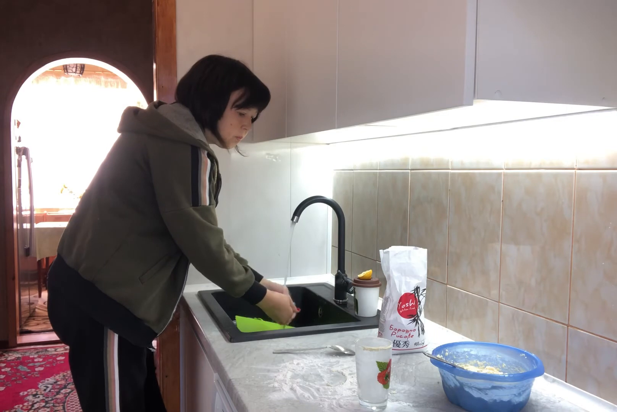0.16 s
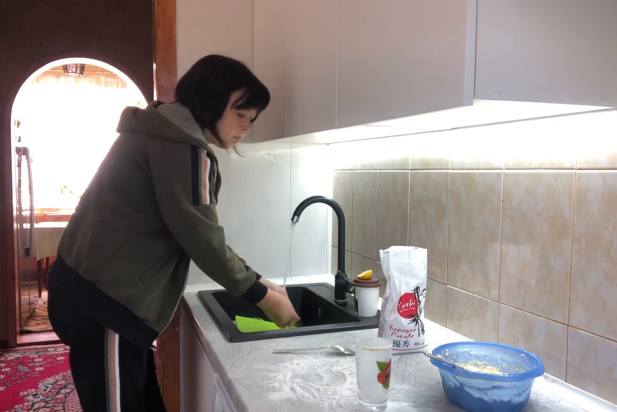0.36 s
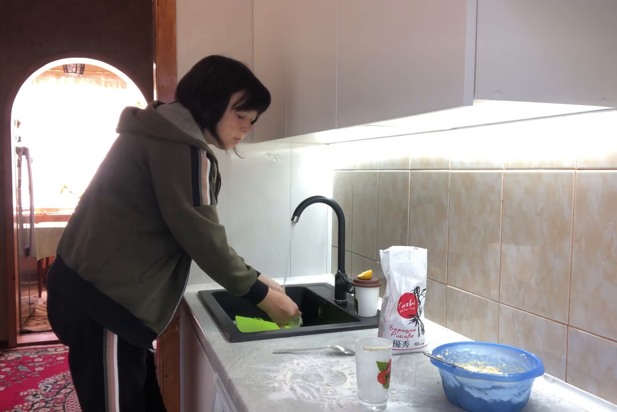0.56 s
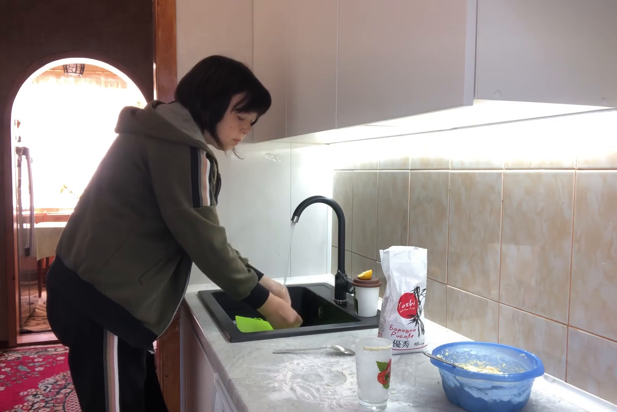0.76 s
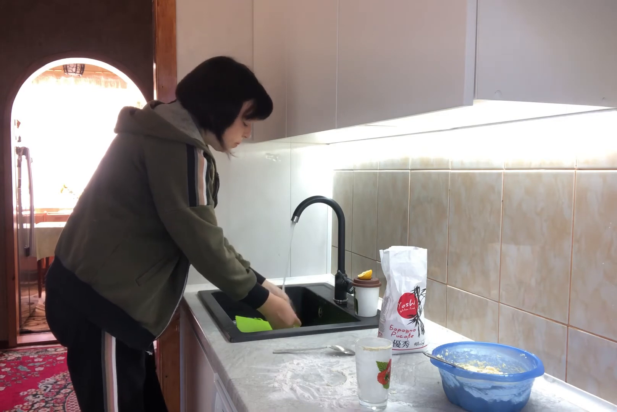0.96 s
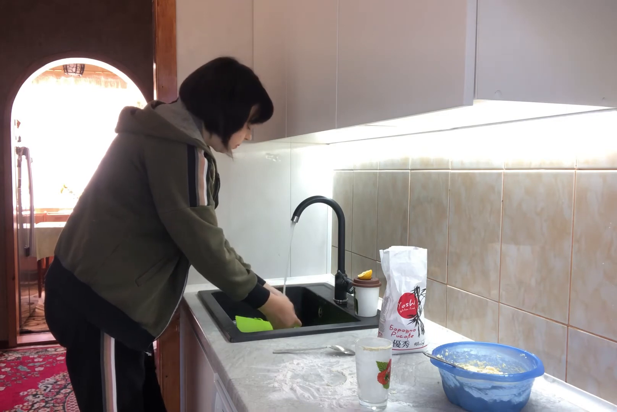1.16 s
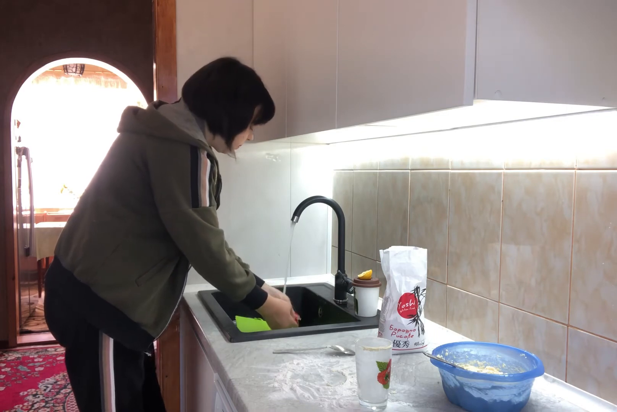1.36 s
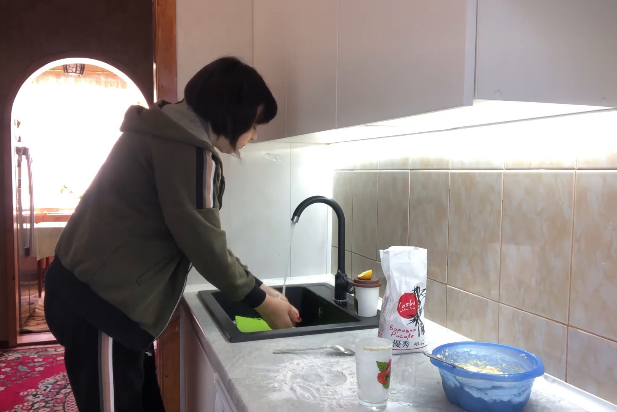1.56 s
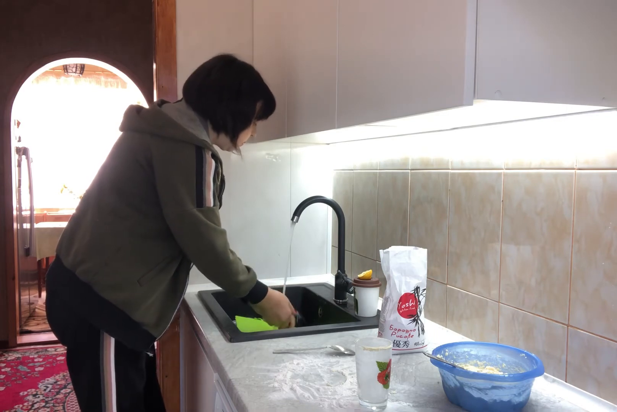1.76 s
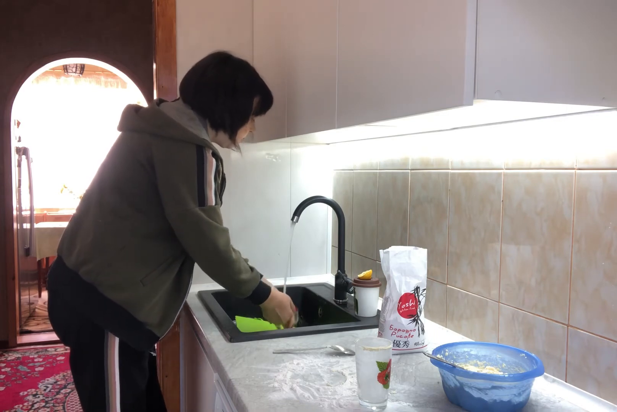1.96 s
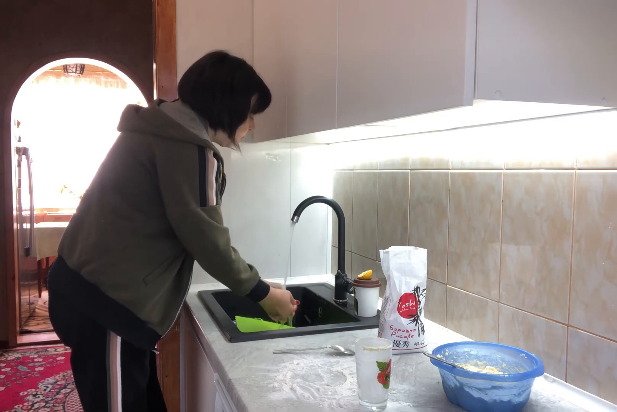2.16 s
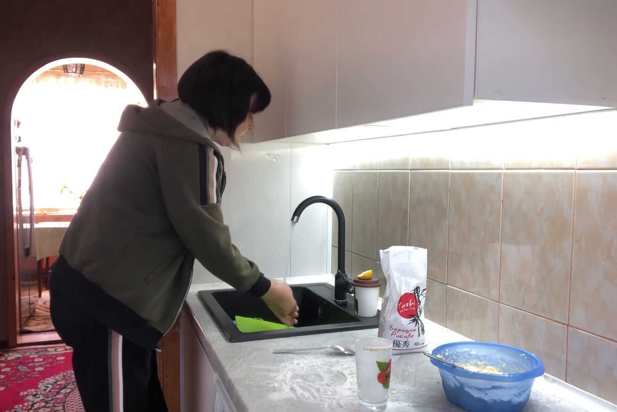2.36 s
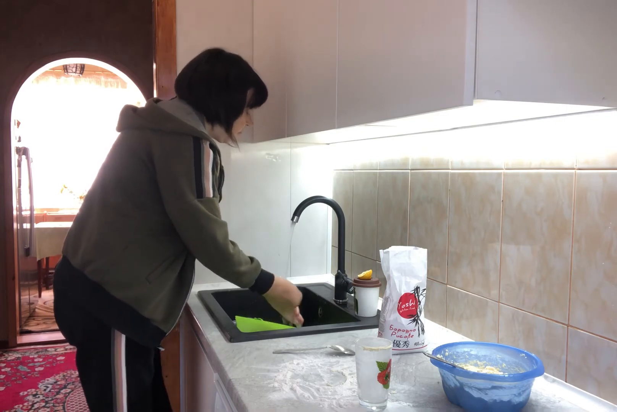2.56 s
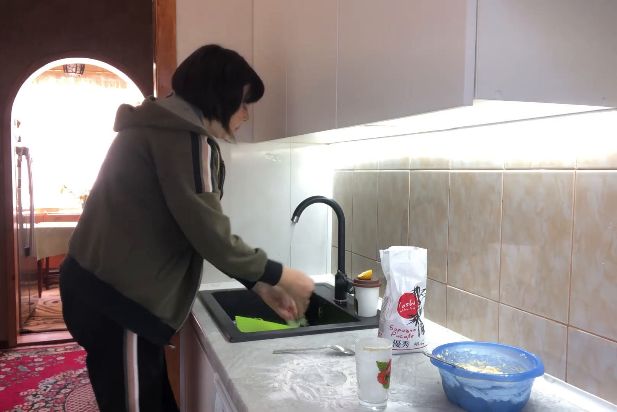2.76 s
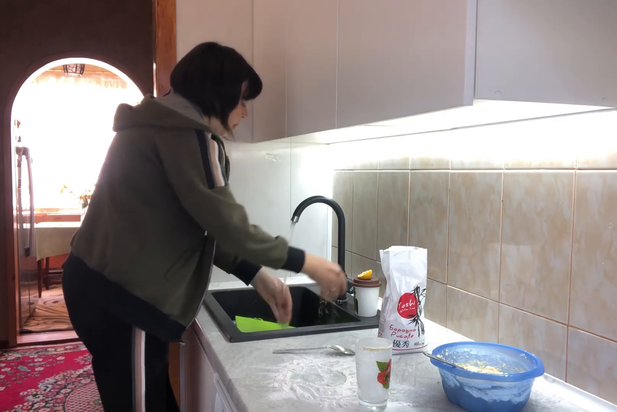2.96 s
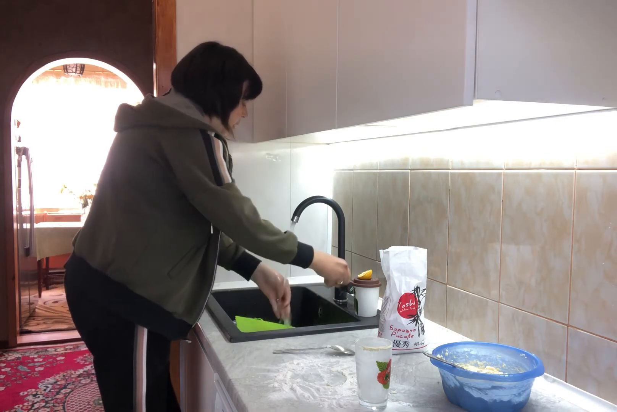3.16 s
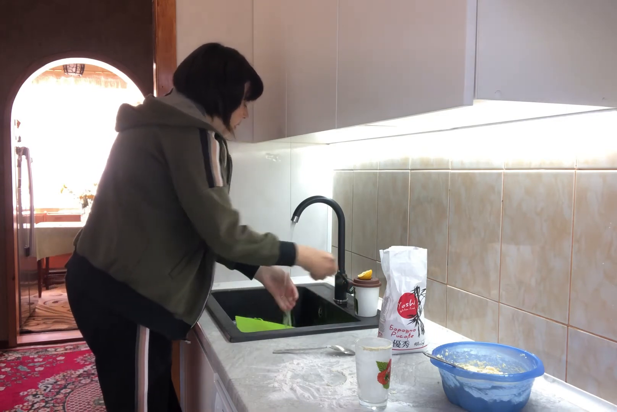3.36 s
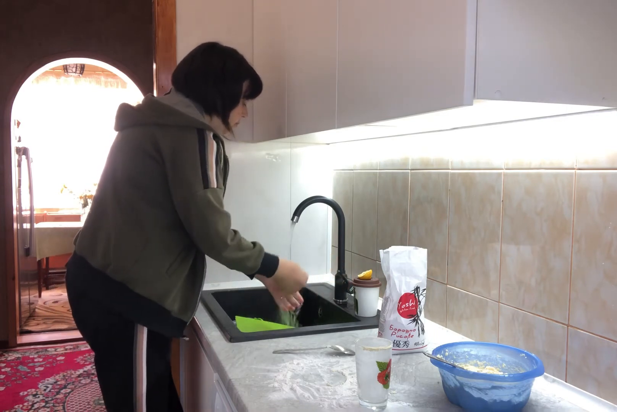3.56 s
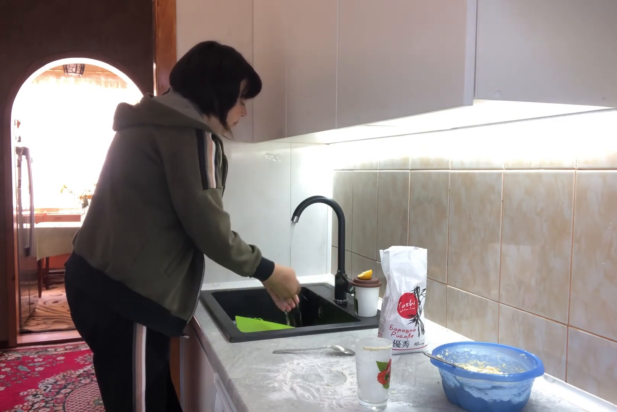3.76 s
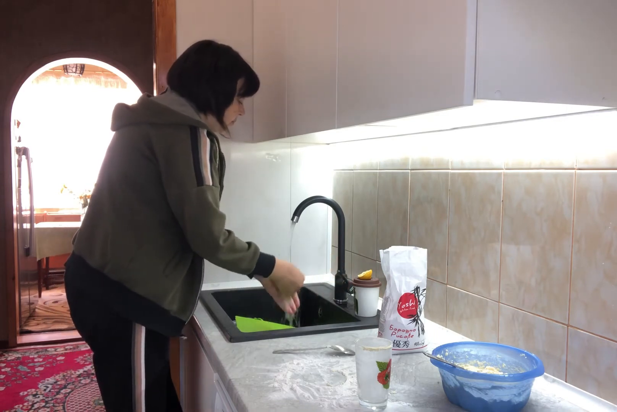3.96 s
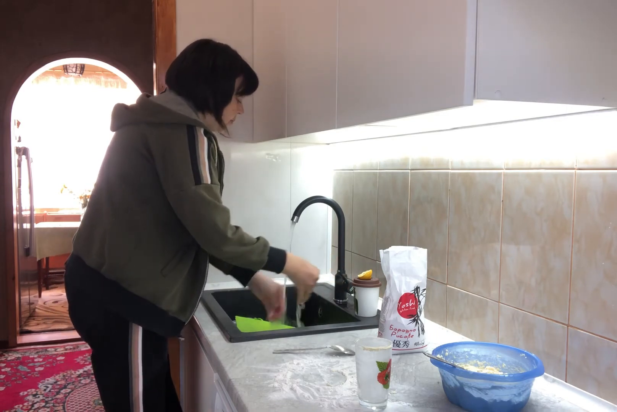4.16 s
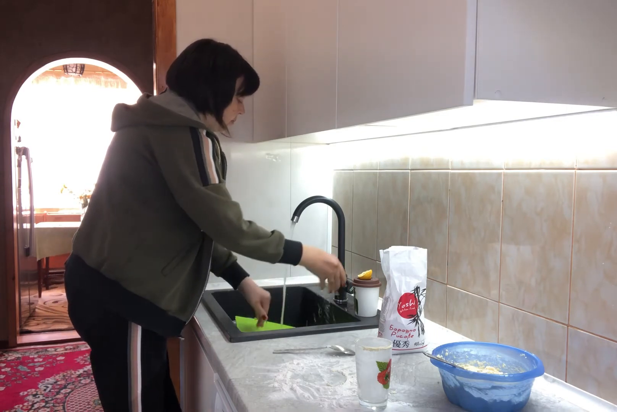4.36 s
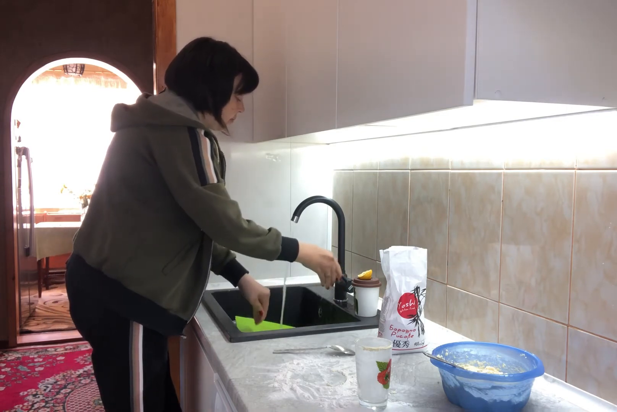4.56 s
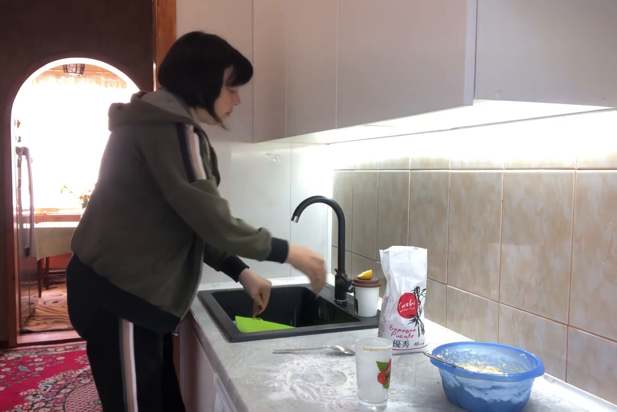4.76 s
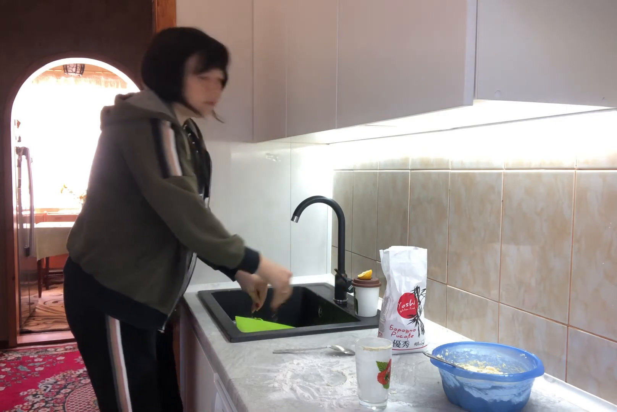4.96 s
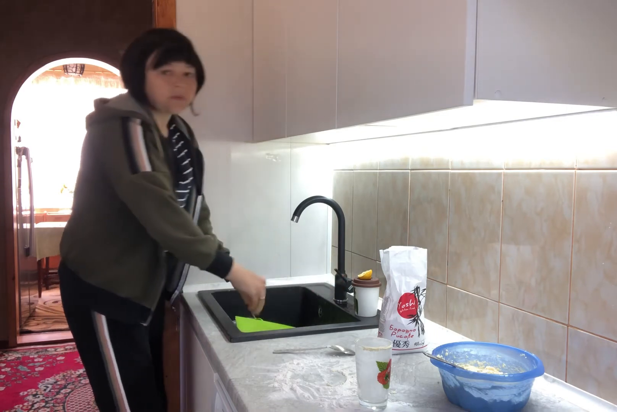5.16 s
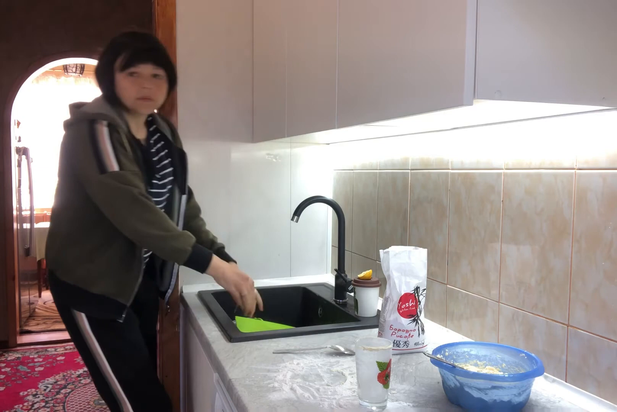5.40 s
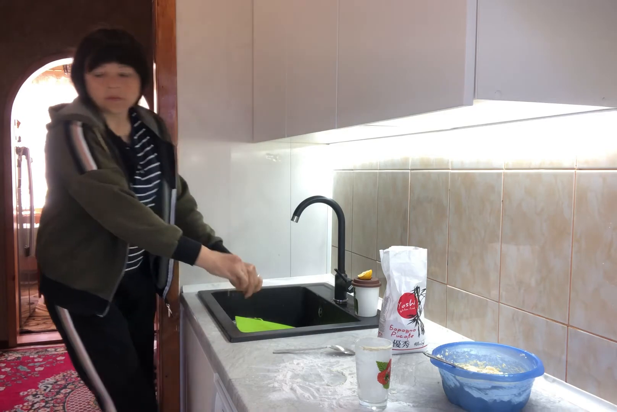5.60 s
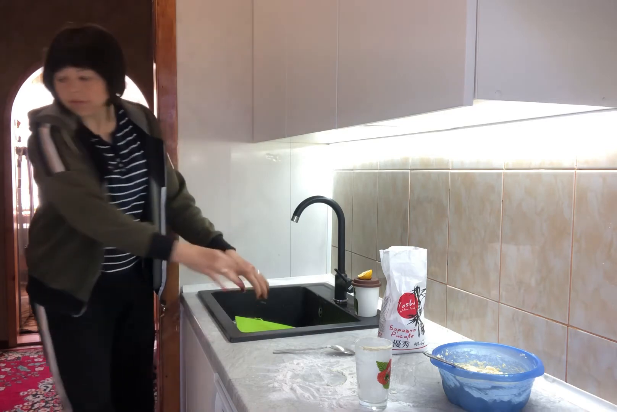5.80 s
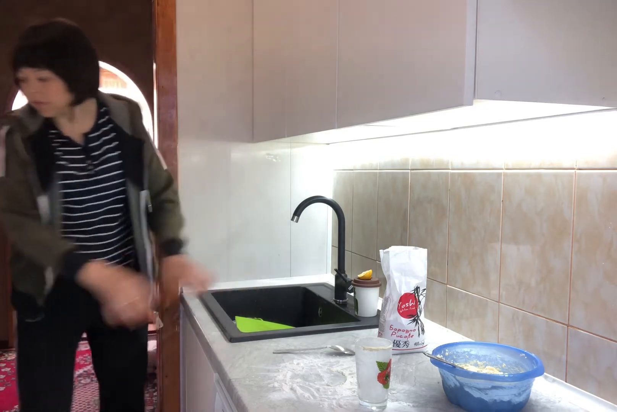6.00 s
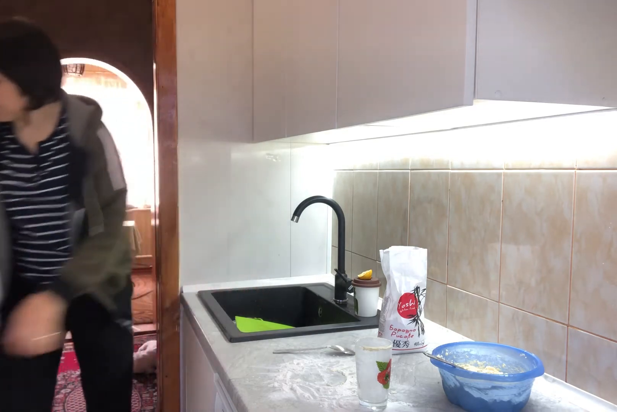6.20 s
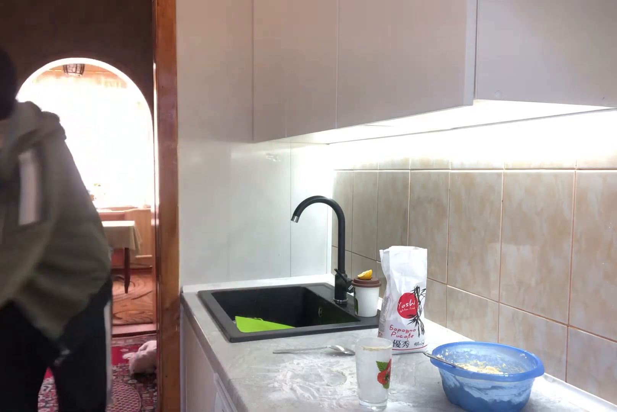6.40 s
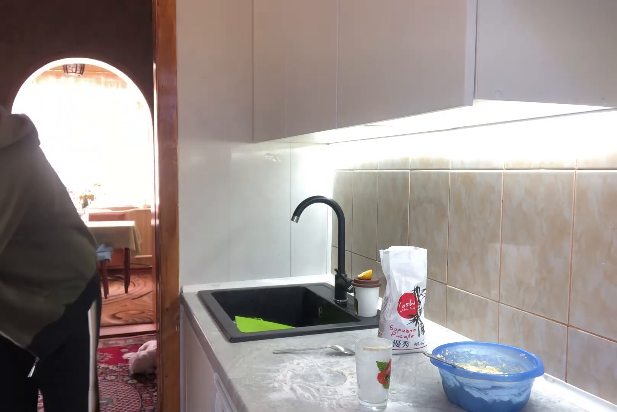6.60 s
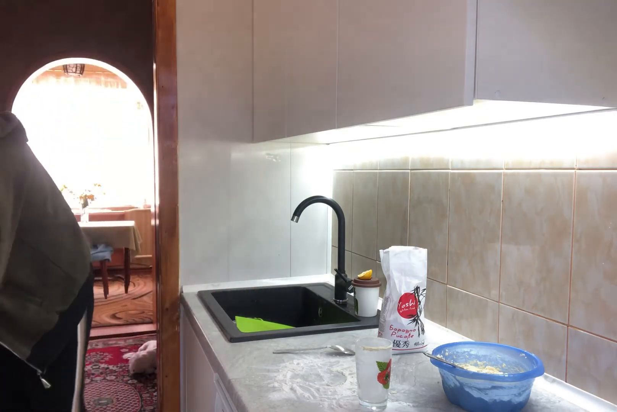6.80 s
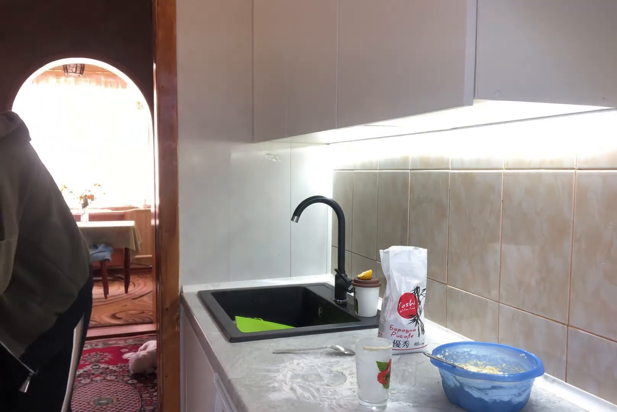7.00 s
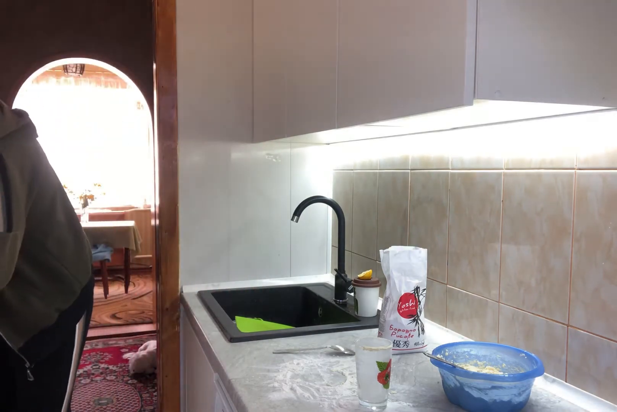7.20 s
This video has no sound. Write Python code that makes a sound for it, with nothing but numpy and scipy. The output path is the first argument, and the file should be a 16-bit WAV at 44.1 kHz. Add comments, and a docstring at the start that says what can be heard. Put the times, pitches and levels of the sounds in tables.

```python
"""A kitchen tap hisses and whistles over hands in a sink and is shut off: filtered noise and wavering sines.
Drops spatter and drum on the basin as shaped random clicks; air bubbles ring in the cupped palms as rising sines.
Slaps are noise puffs and soft knocks are damped modes with a scuff; wet hands are shaken and a sleeve brushes.
Shifting reflections make the small tiled room, over an appliance's mains hum and steady room noise."""
import sys
import numpy as np
from scipy import signal
from scipy.fft import rfft, irfft
from scipy.io import wavfile

SR = 44100
rng = np.random.default_rng(int(sys.argv[2]) if len(sys.argv) > 2 else 0)


def store_pcm(level_fs):
    """Save levels as 16-bit WAV."""
    pcm = np.round(np.clip(level_fs, -1, 1) * 32767).astype(np.int16)
    wavfile.write(sys.argv[1], SR, np.atleast_2d(pcm).T)


N = 319284
TIME = np.arange(N) / SR

# Flow through the valve. Each row: time in seconds, gain in dB.
FLOW_GAIN = [(0, 2.5), (4.3, 2.5), (4.45, 0), (4.6, -33)]
# Hiss spectrum. Each row: frequency in Hz, relative density in dB.
HISS_SPECTRUM = [(700, -9.5), (1050, -10.5), (1500, -6.5), (1850, -2), (2250, -10.5), (3400, -10),
                 (5500, -0.5), (6300, -4.5), (7600, -2.5), (8500, -14), (15500, -17)]
# Valve and spout resonances. Each row: centre in Hz, half-width at -6 dB in Hz, level before flow gain in dB rms.
SPOUT_RESONANCES = [(1482, 14, -66), (2470, 6.5, -68.5), (3437, 13, -68), (3920, 19, -65.5),
                    (5560, 15, -67), (6980, 25, -61), (7135, 70, -55.5)]
# Valve whistle. Each row: time in seconds, level before flow gain in dB rms.
WHISTLE_LEVEL = [(0, -49.5), (0.62, -52.5), (0.7, -61), (0.88, -52), (0.99, -49), (2.93, -50.5),
                 (3.18, -57.5), (3.6, -45.5), (4.07, -52), (4.12, -56), (4.35, -50), (4.46, -60)]
# Thin pure tone of the spout. Each row: time in seconds, level before flow gain in dB rms.
TONE_LEVEL = [(3.62, -68), (3.72, -57), (3.92, -55), (3.99, -71)]


def tap():
    """Flow noise hisses and rings the spout; a whistle and a lower pure tone sound with it, all scaled by flow."""
    hiss = amp(-48.0) * coloured(rng.standard_normal(N), HISS_SPECTRUM)
    spout = sum(amp(db) * narrow_noise(hz, half_width_hz) for hz, half_width_hz, db in SPOUT_RESONANCES)
    whistle = level(WHISTLE_LEVEL) * wavering_tone(6543, jitter_hz=16.4, flutter_db=3.5)
    tone_gain = amp(np.interp(TIME, *np.transpose(TONE_LEVEL)))
    tone = tone_gain * wavering_tone(3840, jitter_hz=2, flutter_db=0.5)
    return (hiss + spout + whistle + tone) * level(FLOW_GAIN)


def wavering_tone(hz, jitter_hz, flutter_db):
    """A whistle of rms 1 whose pitch and strength tremble with the turbulence."""
    turns = np.cumsum(hz + jitter_hz * wander(per_s=64)) / SR
    return evened(np.sin(2 * np.pi * turns) * amp(flutter_db * wander(per_s=29)))


def narrow_noise(hz, half_width_hz):
    """Turbulence ringing in one sharp resonance: a fuzzy whistle of rms 1."""
    offset = (np.fft.rfftfreq(N, 1 / SR) - hz) / half_width_hz
    return evened(irfft(rfft(rng.standard_normal(N)) / (1 + offset ** 2), N))


# Spectra of spatter, fine spray and basin drumming. Each row: frequency in Hz, relative density in dB.
SPATTER_SPECTRUM = [(900, -68), (2300, -7.5), (3100, -1), (4600, 1), (6000, -5), (7600, -6), (9500, -9),
                    (15500, -24)]
SPRAY_SPECTRUM = [(3000, -10.5), (6000, 6), (8500, 3), (12500, 0.5), (15500, -8)]
BASIN_SPECTRUM = [(60, -38), (140, -18), (190, 1), (280, -1), (390, 2), (520, -3), (660, -3.5), (820, -1.5),
                  (1000, -8.5), (1500, -13), (2500, -33), (5000, -48)]
# Weight of water landing on the basin floor. Each row: time in seconds, relative level in dB.
DRUMMING_LEVEL = [(0, -53.5), (1.8, -55), (3.5, -52), (4.1, -53.5), (4.27, -50.5), (4.5, -55.5), (4.6, -60),
                  (4.85, -58)]


def splash():
    """The stream breaks on the hands: ringing droplets, fine spray, and heavier water drumming on the basin."""
    clumps = amp(1.3 * wander(per_s=45) + wander(per_s=9))
    drops = droplets(per_s=3500, spread_db=2.2, cycles=45)
    clicks = evened(impacts(per_s=1700, spread_db=5.5))
    spatter = coloured(drops + 0.6 * clicks, SPATTER_SPECTRUM) + 1.33 * plinks()
    spray = coloured(impacts(per_s=4000, spread_db=1.2), SPRAY_SPECTRUM)
    spray = spray * patter(per_s=120, decay_s=0.0075, depth=0.93)
    drumming = coloured(impacts(per_s=480, spread_db=2.5), BASIN_SPECTRUM)
    spatter_gain, spray_gain = thrown_water()
    return (amp(-0.5) * clumps * spatter * spatter_gain + spray * spray_gain
            + amp(-1.3) * drumming * level(DRUMMING_LEVEL))


# Undisturbed stream, thinner while the hands draw back.
# Each row: start in seconds, length in seconds, relative spatter level in dB, fine spray level in dB.
STREAM_SPELLS = [(0, 3.08, -49, -53), (3.198, 0.4, -48, -56), (3.696, 0.23, -54, -52),
                 (3.936, 0.7, -52.5, -55)]
# Splashes thrown up by the hands and by the last of the stream. Each row: as for the stream.
HAND_SPLASHES = [(-0, 0.28, -49, -49.5), (0.67, 0.025, -47, -51), (0.89, 0.52, -51, -50.5),
                 (1.515, 0.44, -49, -46.5), (2.029, 0.045, -44, -48), (2.13, 0.051, -44, -60),
                 (2.36, 0.019, -47.5, -50), (2.52, 0.16, -57, -53), (2.857, 0.2, -49, -58),
                 (3.508, 0.15, -46.5, -46.5), (3.92, 0.07, -46, -49), (4.162, 0.36, -46, -44.5),
                 (4.32, 0.16, -45.5, -45), (4.577, 0.17, -46.5, -41.5)]
STREAM_ATTACK_S, SPLASH_SWELL_SHARE, FALL_DB_PER_S = 0.0028, 0.14, 210  # swell: share of splash length


def thrown_water():
    """Gains of spatter and of fine spray: the splashes add their power to that of the stream."""
    rows = [(*row, STREAM_ATTACK_S) for row in STREAM_SPELLS]
    rows += [(*row, SPLASH_SWELL_SHARE * row[1]) for row in HAND_SPLASHES]
    power = 0
    for s, length_s, spatter_db, spray_db, attack_s in rows:
        gains = np.outer(amp([spatter_db, spray_db]), surge(s, length_s, attack_s))
        power = power + gains ** 2
    return np.sqrt(power)


def surge(s, length_s, attack_s):
    """Envelope of thrown water: attack, hold, then a steady fall in dB."""
    attack = np.clip((TIME - s) / attack_s, 0, 1)
    return attack * amp(-FALL_DB_PER_S * np.maximum(TIME - s - length_s, 0))


def droplets(per_s, spread_db, cycles, count=28):
    """Drops of many sizes, each ringing for a few cycles; the favoured sizes drift as the hands turn."""
    drops, kind = impacts(per_s, spread_db), rng.integers(0, count, N)
    out = np.zeros(N)
    drift = wander(per_s=7.4)
    for k, hz in enumerate(np.geomspace(1700, 9500, count)):
        ring = bubble(hz, cycles / hz, rise=0.02)
        favour = amp(2.4 * np.sin(k / 2 + 2 * drift))
        out += signal.oaconvolve(drops * favour * (kind == k), ring * hz)[:N]
    return evened(out)


def plinks(count=220):
    """Now and then a small drop traps a bubble that rings clear of the spatter."""
    out = np.zeros(N)
    for when, size, strength in rng.random((count, 3)):
        hz = 3000 * 2 ** size
        add(out, when * N / SR, amp(9 * strength) * bubble(hz, 80 / hz, rise=0.02))
    return out


def patter(per_s, decay_s, depth):
    """Gain of rms 1: each lump of water bursts at once into spray that dies away."""
    arrivals = rng.exponential(1, N) * (rng.random(N) < per_s / SR)
    lumps = signal.lfilter([1], [1, -np.exp(-1 / (decay_s * SR))], arrivals)
    return evened(np.sqrt(1 + depth * lumps))


# Bursts of small bubbles trapped between the hands.
# Each row: start in seconds, length in seconds, central pitch in Hz, level in dB rms over that length.
GURGLE_BURSTS = [(0.027, 0.03, 2710, -44.5), (0.40, 0.21, 1750, -52.5), (2.267, 0.26, 1660, -51.5),
                 (2.443, 0.04, 1106, -54), (2.568, 0.098, 3100, -50), (2.87, 0.073, 2960, -49),
                 (3.254, 0.06, 2300, -53.5), (3.586, 0.023, 2420, -48), (3.866, 0.074, 1940, -54.5)]


def gurgles(bubbles_per_s=230, scatter=0.15, cycles=22, count=64):
    """Each pocket of air between the palms breaks into ever weaker bubbles of scattered sizes."""
    out = np.zeros(N)
    for s, length_s, hz, db in GURGLE_BURSTS:
        pocket = np.zeros(int((length_s + 0.1) * SR))
        chance = rng.standard_normal((count, 3))[:int(3 + length_s * bubbles_per_s)]
        for k, (late, size, strength) in enumerate(chance):
            pitch_hz = hz * np.exp(scatter * size)
            start_s = length_s * (k + late / 2) / len(chance)
            gain = amp(3.2 * strength - 4 * k / len(chance))
            add(pocket, start_s, gain * bubble(pitch_hz, cycles / pitch_hz))
        rms = np.sqrt(np.sum(pocket ** 2) / (length_s * SR))
        add(out, s, amp(db) * pocket / rms)
    return out


# Single drops and large bubbles. Each row: start in seconds, level in dB, starting pitch in Hz, t60 in seconds.
SINGLE_DRIPS = [(0.375, -32.5, 1370, 0.022), (0.379, -37, 1046, 0.06), (0.497, -40, 1320, 0.027),
                (0.57, -40, 1350, 0.037), (0.672, -32.5, 3330, .03), (1.594, -37.5, 1040, 0.038),
                (2.249, -34, 1480, 0.047), (2.451, -32, 1940, 0.02), (2.624, -31, 3540, 0.028),
                (2.683, -37, 2470, 0.036), (2.8997, -33, 2560, .025), (2.964, -35, 2980, .03),
                (3.173, -31.5, 2370, 0.0085), (3.2517, -34, 2090, 0.018), (4.656, -31, 4070, 0.024),
                (5.542, -37.5, 3500, 0.01), (5.734, -43.5, 1600, 0.042)]


def drips():
    """Large bubbles and stray drops ring alone."""
    out = np.zeros(N)
    for s, db, hz, t60_s in SINGLE_DRIPS:
        add(out, s, amp(db) * bubble(hz, t60_s, rise=0.066))
    return out


def bubble(hz, t60_s, rise=0.093):
    """An air bubble rings, its pitch climbing by twice the rise over t60 as it nears the surface."""
    t = np.arange(int(t60_s * SR) + 2) / SR
    envelope = amp(-60 * t / t60_s) * (1 - np.exp(-2 * hz * t))
    return envelope * np.sin(2 * np.pi * hz * t * (1 + rise * t / t60_s))


# Sharp slaps and ticks of water and fingers.
# Each row: start in seconds, peak in dB, centre frequency in Hz, t60 in seconds.
WET_SLAPS = [(0.161, -29, 3250, 0.075), (1.594, -33, 5200, .02), (2.142, -27, 4380, .04),
             (3.616, -28.5, 10000, 0.073), (4.552, -25, 5400, 0.099), (4.6245, -26, 8800, 0.038),
             (5.164, -37.5, 2180, .03), (5.189, -38, 1890, .035), (5.202, -30, 1430, 0.026),
             (5.247, -31, 1980, 0.032), (5.3235, -33.5, 6230, 0.01), (5.34, -38, 1020, 0.014),
             (6.131, -41.5, 1920, 0.067)]


def slaps():
    """Water and fingers slap without ringing: short puffs of band noise."""
    out = np.zeros(N)
    for s, db, hz, t60_s in WET_SLAPS:
        add(out, s, amp(db) * burst(hz, t60_s, breadth=0.53))
    return out


# Dull knocks of the lever, the cupboard and feet.
# Each row: start in seconds, level in dB, lowest mode in Hz, t60 of that mode in seconds.
DULL_KNOCKS = [(2.133, -45, 280, 0.076), (4.227, -40.5, 300, .06), (4.526, -39, 794, 0.024),
               (4.533, -42.5, 189, 0.091), (4.55, -45, 102.6, 0.21), (4.938, -38.5, 810, 0.012),
               (4.985, -37.5, 316, 0.043), (5.035, -42.5, 246, 0.049), (5.347, -43.5, 281, 0.081),
               (5.991, -39.5, 487, 0.041), (6.009, -38.5, 270, 0.053), (6.132, -41, 676, 0.05)]
# Modes of knocked wood and basin. Each row: multiple of the lowest mode, relative level in dB.
THUD_MODES = [(1, 9), (1.37, 1), (1.9, -6), (2.7, -14)]


def knocks():
    """A knock adds a few damped modes to its scuff, the higher ones dying sooner."""
    out, t = np.zeros(N), np.arange(SR // 2) / SR
    for s, db, hz, t60_s in DULL_KNOCKS:
        ring = np.zeros(len(t))
        for k, mode_db in THUD_MODES:
            ring += amp(mode_db - 60 * t * np.sqrt(k) / t60_s) * np.sin(2 * np.pi * k * hz * t)
        push = 1 - np.exp(-1.3 * hz * t)  # a soft contact builds up over the first cycle
        scuff = burst(1.43 * hz, 2.3 * t60_s, breadth=0.63)
        add(out, s, amp(db) * push * (0.74 * ring + amp(-2.5) * scuff))
    return out


def burst(hz, t60_s, breadth):
    """A short contact: a dying puff of noise around one frequency, peak 1."""
    t = np.arange(SR // 2) / SR
    band_hz = np.clip([hz / (1 + breadth), hz * (1 + breadth)], 20, SR / 2 - 100)
    sos = signal.butter(2, band_hz, "band", fs=SR, output="sos")
    puff = signal.sosfilt(sos, rng.standard_normal(len(t)) * amp(-60 * t / t60_s))
    return puff / abs(puff).max()


# Wet skin spectrum. Each row: frequency in Hz, relative density in dB.
PALMS_SPECTRUM = [(150, -8), (500, -3.5), (3300, -1), (5000, -6), (9000, -5), (15500, -14)]
# Wet hands shaken over the sink. Each row: time in seconds, level in dB.
SHAKE_LEVEL = [(5.11, -59), (5.15, -49.5), (5.235, -49.5), (5.255, -42), (5.3, -58), (5.4, -59)]


def shaken_hands():
    """Wet fingers flick and rub: dense random clicks under a moving level."""
    hands = coloured(impacts(per_s=5900, spread_db=4.0), PALMS_SPECTRUM)
    return hands * level(SHAKE_LEVEL) * (TIME > SHAKE_LEVEL[0][0])


# Cloth spectrum. Each row: frequency in Hz, relative density in dB.
CLOTH_SPECTRUM = [(150, -17), (700, 2), (2500, -3), (8000, -3.5), (15500, -19)]
# Sleeve brushing the jacket. Each row: time in seconds, level in dB.
SLEEVE_LEVEL = [(6.14, -72), (6.22, -55.5), (6.275, -50.5), (6.33, -55), (6.42, -73)]


def sleeve():
    """Cloth slides on cloth: denser, more uneven clicks in one swelling brush."""
    cloth = coloured(impacts(per_s=8100, spread_db=6.5), CLOTH_SPECTRUM)
    return cloth * level(SLEEVE_LEVEL) * (TIME > SLEEVE_LEVEL[0][0])


# Decay of the kitchen. Each row: frequency in Hz, t60 in seconds.
KITCHEN_DECAY = [(150, 0.26), (1000, 0.24), (5000, 0.11), (15000, 0.069)]
WATER_ROOM_DB, BUBBLE_ROOM_DB, KNOCK_ROOM_DB = -5, -2, -8  # share of each returned by the room
PATH_SHIFTS_PER_S = 4


def kitchen(x, count=7):
    """Dense basin, tile and cupboard reflections, treble dying first; the reflection paths crossfade in turn at
    a steady pace."""
    out = np.zeros(N)
    for k in range(count):
        taps = rng.choice([-1., 1.], SR // 2) * (rng.random(SR // 2) < 4000 / SR)
        taps[:SR // 400] = 0  # no reflection in the first 2.5 ms
        hz, t, z = signal.stft(taps, SR, nperseg=256)
        decay = amp(-60 * t / read(KITCHEN_DECAY, hz)[:, None])
        tail = signal.istft(z * decay, SR, nperseg=256)[1]
        turn = (PATH_SHIFTS_PER_S * TIME - k) % count
        share = np.sin(np.pi / 2 * turn) * (turn < 2)
        out += signal.fftconvolve(x * share, tail / np.linalg.norm(tail))[:N]
    return out


# Room noise spectrum. Each row: frequency in Hz, relative density in dB.
AIR_SPECTRUM = [(25, -31), (65, 3.5), (130, 4), (200, 3), (300, 0), (420, 0), (650, -5), (1500, -7),
                (2100, -10), (3200, -7), (7300, -10.5), (8600, -12.5), (15500, -18)]
HUM_HZ = 100.05


def background():
    """An appliance hums at twice the mains frequency, wavering a little, over the steady noise of the room."""
    hum = amp(-50.5) * evened(np.sin(2 * np.pi * HUM_HZ * TIME))
    waver = amp(-62.5) * narrow_noise(HUM_HZ, half_width_hz=9.7)
    air = amp(-53.5) * coloured(rng.standard_normal(N), AIR_SPECTRUM)
    return hum + waver + air


def impacts(per_s, spread_db):
    """Random clicks of either sign, many small and a few large."""
    size = amp(spread_db * np.minimum(rng.exponential(1, N), 4))
    return size * np.sign(rng.standard_normal(N)) * (rng.random(N) < per_s / SR)


def wander(per_s):
    """Smooth chance of rms 1."""
    lowpass = np.exp(-(np.fft.rfftfreq(N, 1 / SR) / per_s) ** 2)
    return evened(irfft(rfft(rng.standard_normal(N)) * lowpass, N))


def coloured(x, spectrum):
    """Gives x a spectrum and rms 1."""
    return evened(irfft(rfft(x) * amp(read(spectrum, np.fft.rfftfreq(N, 1 / SR))), N))


def read(points, hz):
    """Reads a curve on a log-frequency axis."""
    f, value = np.transpose(points)
    return np.interp(np.log(hz + 1), np.log(f + 1), value)


def level(rows):
    """A dB curve over time as gain, at -120 dB after its end."""
    s, db = np.transpose(rows)
    return amp(np.interp(TIME, s, db, right=-120))


def evened(x):
    """Scales to rms 1."""
    return x / np.sqrt(np.mean(x ** 2) + 1e-20)


def amp(db):
    """Decibels to gain."""
    return 10 ** (np.asarray(db) / 20)


def add(mix, s, sound):
    """Mixes a sound in at s seconds."""
    part = mix[max(round(s * SR), 0):][:len(sound)]
    part += sound[:len(part)]


def scene():
    """Everything is heard from one point on the counter, alike in both channels."""
    water = splash() + shaken_hands() + sleeve()
    bubbles = gurgles() + drips()
    contacts = slaps() + knocks()
    room = kitchen(amp(WATER_ROOM_DB) * water + amp(BUBBLE_ROOM_DB) * bubbles + amp(KNOCK_ROOM_DB) * contacts)
    mono = water + bubbles + contacts + room + tap() + background()
    return np.array([mono, mono])


EDGE_HZ = 15850


def record(dry):
    """The recorder's band limit: a steep linear-phase low-pass."""
    lowpass = signal.firwin(511, EDGE_HZ, window=("kaiser", 9), fs=SR)
    return signal.oaconvolve(dry, lowpass[None], "same")


dry = scene()
out = record(dry)
store_pcm(out)
```